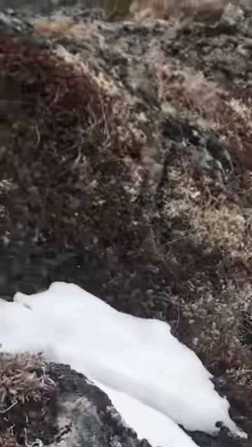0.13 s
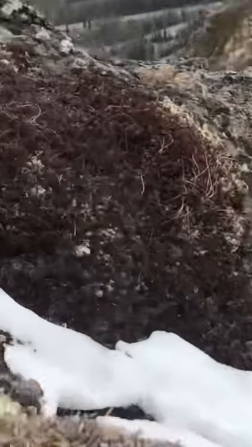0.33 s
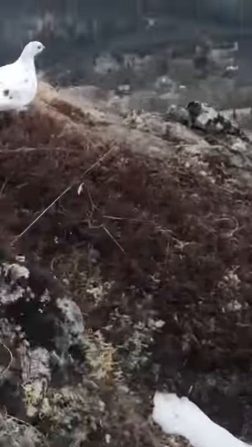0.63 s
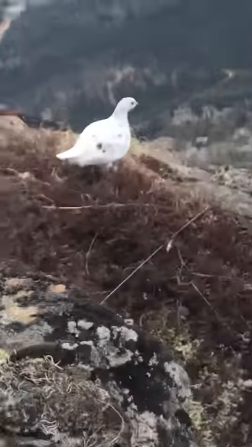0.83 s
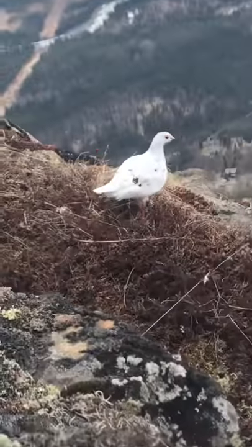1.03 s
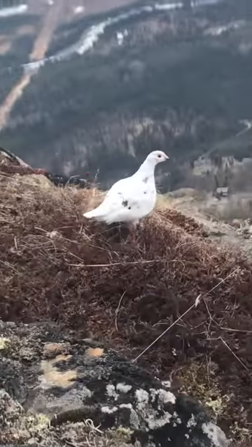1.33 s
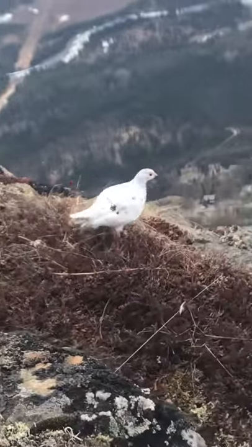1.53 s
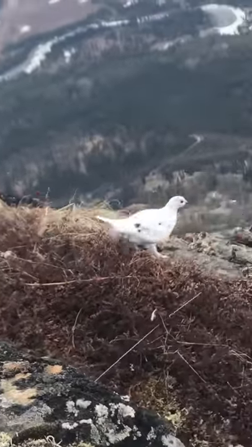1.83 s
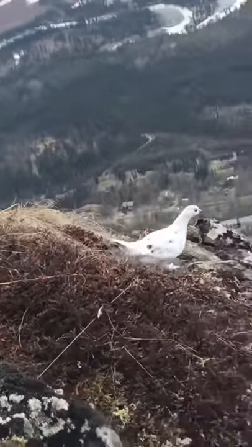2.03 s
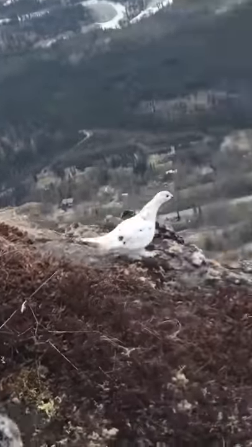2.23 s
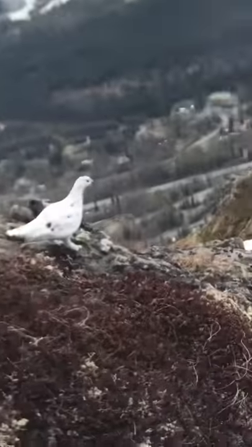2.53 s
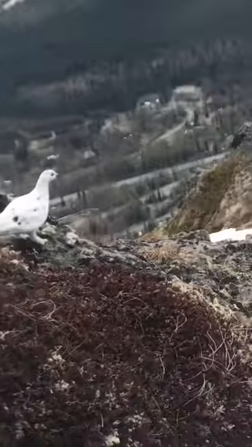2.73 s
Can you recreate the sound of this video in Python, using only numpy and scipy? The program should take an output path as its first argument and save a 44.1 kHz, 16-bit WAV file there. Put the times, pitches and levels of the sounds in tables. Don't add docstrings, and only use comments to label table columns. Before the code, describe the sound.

Clicking grouse calls come in two short runs outdoors, after close twig knocks and dry rustling; low wind thumps and pops on the microphone, over a faint valley hum and a very distant songbird whistle.

```python
import sys
import numpy as np
from scipy import signal
from scipy.io import wavfile
from scipy.ndimage import uniform_filter1d

SR = 44100
rng = np.random.default_rng(int(sys.argv[2]) if len(sys.argv) > 2 else 0)


def rack_gain(trim_db):
    fader = np.asarray(trim_db, float)
    return 10 ** (fader / 20)


def store_wav(level_fs):
    pcm = np.round(np.clip(np.atleast_2d(level_fs), -1, 1) * 32767)
    wavfile.write(sys.argv[1], SR, pcm.T.astype(np.int16))


N = 127890


def rms_one(x):
    return x / np.sqrt(np.mean(x ** 2) + 1e-20)


def butter_filter(x, order, hz, kind="low"):
    return signal.sosfilt(signal.butter(order, hz, kind, fs=SR, output="sos"), x)


def at_hz(points, hz):
    points_hz, points_db = np.array(points).T
    return np.interp(np.log(hz), np.log(points_hz), points_db, left=-80, right=-80)


def drift(rate):
    pole = np.exp(-80 * np.pi * rate / SR)
    white = rng.standard_normal(N // 40 + 2002)
    slow = signal.lfilter([1], [1, -2 * pole, pole * pole], white)[2000:]
    return np.interp(np.arange(N) / 40, np.arange(len(slow)), rms_one(slow))


def ring(start_s, peak_db, hz, t60_s):
    out, start = np.zeros(N), int(start_s * SR)
    t = np.arange(min(N - start, SR // 10)) / SR
    out[start:start + len(t)] = rack_gain(peak_db - 60 * t / t60_s) * np.sin(2 * np.pi * hz * t)
    return out


def bank(spectrum, white, band_db):
    hz = np.array(spectrum)[:, 0]
    edges = hz[0] * 2 ** np.arange(0, np.log2(hz[-1] / hz[0]) + .2, 1 / 3)
    out = 0
    for k, (low, high) in enumerate(zip(edges, edges[1:])):
        band = butter_filter(white[k % 2], 2, [low, high], "band")[-N:]
        centre_hz = min(np.sqrt(low * high), hz[-1])
        out = out + band * rack_gain(at_hz(spectrum, centre_hz) + band_db(k))
    return out


def gust_db():
    # time_s, level_db
    gusts = [(0.0, -29.5), (0.022, -25.5), (0.65, -31), (0.981, -17.5), (1.061, -23), (1.442, -23),
             (1.48, -23), (1.72, -19.5), (1.788, -28), (2.029, -21), (2.05, -25), (2.352, -20.5),
             (2.38, -30.5), (2.579, -20.5), (2.619, -33), (2.749, -13.5), (2.809, -29.5), (2.9, -16.5)]
    return np.interp(np.arange(N) / SR, *np.transpose(gusts))


def valley():
    # band_hz, level_db (per Hz)
    valley_spectrum = [(280, -24.5), (480, -6), (875, -5), (1090, -7), (2080, -21), (2740, -23),
                       (5000, -30), (15900, -33.5)]
    level_db, duck_db_per_gust_db, duck_s = -62, 0.66, 1
    gust = uniform_filter1d(gust_db(), int(duck_s * SR))
    white = rng.standard_normal((2, N + SR))
    hum = rms_one(bank(valley_spectrum, white, lambda k: drift(3.6)))
    return rack_gain(level_db - duck_db_per_gust_db * (gust - gust.mean())) * hum


def songbird():
    # start_s, length_s, from_hz, to_hz, level_db
    twitter = [
        (2.447, 0.079, 2650, 2860, -84),
        (2.516, 0.027, 3830, 3470, -81),
        (2.572, .035, 3500, 3200, -79),
        (2.634, 0.021, 3300, 3300, -76.5),
    ]
    rough_db = 7
    out = np.zeros(N)
    for start_s, length_s, from_hz, to_hz, level_db in twitter:
        t = np.arange(int(length_s * SR)) / SR
        cycles = from_hz * t + (to_hz - from_hz) * t ** 2 / length_s / 2
        swell = np.sqrt(2 * np.sin(np.pi * t / length_s))
        level = rack_gain(level_db + rough_db * drift(150.0)[:len(t)])
        start = int(start_s * SR)
        out[start:start + len(t)] += level * swell * np.sin(2 * np.pi * cycles)
    return out


def wind():
    # band_hz, level_db (per Hz)
    wind_spectrum = [(27, -18), (49, 8), (75, 5.5), (150, -11), (220, -26.5), (290, -57.5), (460, -60.5),
                     (700, -62.5)]
    # time_s, width_s, change_db
    shoves = [(0.236, 0.017, -7.5), (0.353, 0.035, -2.5), (0.597, 0.016, -7.5), (.76, 0.017, 3),
              (.855, 0.021, -7.5), (0.962, 0.011, 5.5), (1.11, 0.0082, -2), (1.292, 0.021, 6),
              (1.391, 0.028, 2.5), (1.497, 0.0094, -10), (1.694, 0.029, 4), (1.944, 0.01, 9.5),
              (2.015, 0.0048, 7), (2.619, .02, -5), (2.752, 0.018, 0), (2.884, 0.0093, 5)]
    low_hz, top_hz, even_s = 32, 417, 0.04
    lump_db, flutter_db, flutter_grows_db, brightens = 0.1, 4, 2.0, 0.6
    t = np.arange(N) / SR
    gust = gust_db()
    for time_s, width_s, change_db in shoves:
        gust = gust + change_db * np.exp(-((t - time_s) / width_s) ** 2)

    def band_db(k):
        flutter = (flutter_db + flutter_grows_db * k / 10) * drift(21.7)
        return flutter + brightens * k / 10 * (gust - gust.mean())

    noise = bank(wind_spectrum, rng.standard_normal((2, N + SR)), band_db)
    noise = butter_filter(noise, 4, low_hz, "high")
    size = int(even_s * SR)
    power = uniform_filter1d(uniform_filter1d(noise ** 2, size), size // 2)
    even = noise / np.sqrt(np.abs(power) + 1e-12)
    return butter_filter(rack_gain(gust + lump_db * drift(6.3)) * even, 4, top_hz)


def eddies():
    # start_s, peak_db, pitch_hz
    bursts = [(.958, -27.5, 354), (.975, -29, 382), (.968, -23, 252), (1.001, -17.5, 229), (0.99, -31, 375),
              (1.008, -16.5, 486), (1.063, -33.5, 478), (1.304, -35, 520), (1.325, -43, 295.5),
              (1.434, -28.5, 322), (1.512, -44.5, 390), (1.543, -35, 332), (1.531, -30.5, 199),
              (1.561, -35.5, 200), (1.612, -19.5, 472), (1.637, -27.5, 357), (1.663, -29, 404),
              (1.6689, -14.5, 383), (1.6842, -17.5, 398), (1.74, -33, 565), (1.94, -58, 289),
              (2.081, -27, 340), (2.345, -29, 373), (2.36, -28, 391), (2.701, -33, 248),
              (2.736, -33.5, 329), (2.771, -29.5, 234)]
    rise_s, fall_s, sag_per_s = 0.00073, 0.0088, 110
    out, t = np.zeros(N), np.arange(SR // 20) / SR
    shape = (1 - np.exp(-t / rise_s)) ** 2 * np.exp(-t / fall_s)
    shape = shape / shape.max()
    signs = rng.choice([-1, 1], len(bursts))
    for (start_s, peak_db, pitch_hz), sign in zip(bursts, signs):
        cycles = pitch_hz * (1 - np.exp(-sag_per_s * t)) / sag_per_s
        start = int(start_s * SR)
        out[start:start + len(t)] += sign * rack_gain(peak_db - 2.0) * shape * np.sin(2 * np.pi * cycles)
    return out


def rustle():
    # start_s, length_s, level_db, lower_half_db
    strokes = [(0.011, 0.062, -74.5, 14.5), (0.092, 0.047, -64.5, 5), (0.223, 0.0077, -71, 11),
               (0.327, 0.017, -61.5, -4), (.437, 0.0074, -61, 2), (0.446, 0.036, -68.5, 0.5),
               (0.488, 0.066, -69.5, -4), (0.555, 0.024, -60, -2), (.01, 0.83, -75.5, 3.5),
               (1.639, 0.064, -69.5, -1), (1.734, 0.26, -71.5, -5.5), (1.796, 0.047, -67, -12),
               (1.912, 0.057, -80, -9), (2.039, 0.015, -61.5, -1.5), (2.075, 0.0062, -73, -13),
               (2.108, .022, -72.5, -4), (2.312, .035, -85, -9)]
    # band_hz,
    # level_db (per Hz)
    rustle_spectrum = [(3000, -13), (4300, -4), (6200, -7.5), (7600, -9.5), (9300, -2.5), (10500, -4),
                       (12300, -1), (15800, 1)]
    grains_per_s, grain_spread_db, edge_s, edge_share = 4000, 3.2, .005, .28
    t = np.arange(N) / SR
    low, high = np.zeros(N), np.zeros(N)
    for start_s, length_s, level_db, lower_half_db in strokes:
        inside_s = np.minimum(t - start_s, start_s + length_s - t)
        shape = np.clip(inside_s / (edge_s / 4 + edge_share * length_s) + .5, 0, 1)
        high += rack_gain(level_db) * shape
        low += rack_gain(level_db + lower_half_db) * shape
    sizes = rack_gain(grain_spread_db * np.minimum(rng.exponential(1, (2, N)), 5))
    sizes = sizes * rng.choice([-1, 1], (2, N))
    grains = sizes * (rng.random((2, N)) < grains_per_s / SR)
    grains = grains + 0.05 * rng.standard_normal((2, N))
    noise = rms_one(bank(rustle_spectrum, grains, lambda k: 1.5 * drift(30.0)))
    noise = rack_gain(2.8 * drift(60.0)) * noise
    return low * butter_filter(noise, 4, 8000) + high * butter_filter(noise, 4, 8000, "high")


def snaps():
    # start_s, peak_db, body_hz, crack_db
    twigs = [(.0002, -34, 1830, 3), (.0025, -36, 1240, -10), (.055, -47, 2300, -12),
             (0.059, -33.5, 1100, -9), (.078, -41, 1500, -4), (.0805, -30.5, 1060, -15),
             (0.082, -26.5, 650, -9), (0.0965, -26, 1140, -10.5), (0.1043, -21, 1450, -6.5),
             (.1058, -28, 940, -10), (.108, -26.5, 595, -16), (0.111, -41, 1870, -18),
             (.124, -41, 4050, -2), (.2334, -28, 1170, -15), (0.2554, -25.5, 1220, -12.5),
             (0.2845, -40, 1200, -10), (.404, -38, 1110, -9), (0.4579, -37.5, 1170, -10),
             (0.652, -47, 5440, -7.5), (0.6537, -37, 940, -14), (0.652, -39, 557, -26),
             (0.1053, -28, 6200, -34), (.2336, -42.5, 6560, -30), (0.0962, -44, 6200, -30)]
    # mode_hz, mode_db, t60_s
    crack_modes = [(2800, 0, .0045), (6200, -21, .004)]
    # start_s, peak_db, pitch_hz
    dry_ticks = [(0.0485, -44, 6200), (0.036, -57, 4200), (0.2237, -43.5, 9400), (.225, -46, 13500),
                 (0.224, -53, 4300), (0.345, -46, 13050), (.4425, -55, 12000), (0.5652, -52, 12580),
                 (.569, -53, 9300), (0.7155, -53, 12000), (1.8003, -42, 11800), (1.8089, -57, 9500),
                 (1.931, -51, 12100), (2.1042, -51, 9050), (2.1114, -73, 8200), (2.1185, -40, 13900)]
    knock_cycles, tick_t60_s = 5.5, .003
    out, ticks = np.zeros(N), np.zeros(N)
    for start_s, peak_db, body_hz, crack_db in twigs:
        knock_s = knock_cycles / body_hz
        out += ring(start_s, peak_db, body_hz, max(knock_s, .004))
        out -= ring(start_s, peak_db - 5, 1.71 * body_hz, knock_s / 2)
        for mode_hz, mode_db, t60_s in crack_modes:
            level_db = peak_db + crack_db + mode_db + rng.normal(0, 1.9)
            out += ring(start_s, level_db, mode_hz * rng.normal(1, 0.035), t60_s)
    for start_s, peak_db, pitch_hz in dry_ticks:
        ticks += ring(start_s, peak_db, pitch_hz, tick_t60_s)
    return butter_filter(out + 1e-18, 4, 7000) + ticks


def grouse():
    # start_s, peak_db, throat_hz, mouth_hz, beak_hz
    tight = [
        (.8176, -51, 1870, 2800, 3700),
        (.8726, -49, 1927, 3500, 4600),
        (.9207, -40, 1927, 3560, 4590),
        (.9636, -41, 1884, 3150, 4590),
        (2.1737, -43.5, 1808, 3190, 4600),
        (2.2185, -38.5, 1927, 3190, 4640),
        (2.2626, -38.5, 1841, 3250, 5070),
    ]
    # mode_hz, mode_db, t60_s
    tight_modes = [(810, 2, .017), (1900, 1, .015), (3300, -4, .01), (4620, -5, .009), (6050, -7, .004),
                   (1330, 1, .006)]
    # start_s, peak_db, chest_hz, throat_hz, mouth_hz
    opened = [
        (1.0119, -35, 1055, 1733, 3650),
        (1.1005, -35, 1162, 1754, 3908),
        (1.1965, -37.5, 1076, 1668, 3780),
    ]
    # mode_hz, mode_db, t60_s
    open_modes = [(1100, 0, .031), (1730, 0, .031), (3800, -16, .011), (5480, -14, .007)]
    tight_snap_db, open_snap_db, snap_low_hz = 4, -12, 2400
    puff_db, puff_t60_s, throat_top_hz = -9.5, .008, 6900
    echo_s, echo_db = 0.0028, -13.5
    turn_dulls_db_per_s = 3.2
    out, snap, t = np.zeros(N), np.zeros(N), np.arange(SR // 50) / SR
    kinds = ((tight, tight_modes, 1, tight_snap_db), (opened, open_modes, 0, open_snap_db))
    for clicks, modes, first, snap_db in kinds:
        for start_s, peak_db, *pitches in clicks:
            start = int(start_s * SR)
            dull_db = turn_dulls_db_per_s * (start_s - 1)
            tuned = [mode[0] for mode in modes]
            tuned[first:first + len(pitches)] = pitches
            for k, (hz, (_, mode_db, t60_s)) in enumerate(zip(tuned, modes)):
                level_db = peak_db + mode_db - 3.5 - dull_db * (hz > 2500)
                out += (-1) ** k * ring(start_s, level_db, hz, t60_s)
            snap[start + 4] = rack_gain(peak_db + snap_db - dull_db)
            puff = rack_gain(peak_db + modes[2][1] + puff_db - 60 * t / puff_t60_s)
            out[start:start + len(t)] += puff * rng.standard_normal(len(t))
    out += butter_filter(snap + 1e-18, 2, snap_low_hz, "high")
    out = butter_filter(out + 1e-18, 6, throat_top_hz)
    return out + rack_gain(echo_db) * np.roll(out, int(echo_s * SR))


def scene():
    far = valley() + songbird()
    close = wind() + eddies() + rustle() + snaps()
    return (far + close + grouse())[None]


def band_limit(x):
    return signal.sosfilt(signal.butter(12, 16080, fs=SR, output="sos"), x)


def record(dry):
    mix = signal.sosfilt(signal.cheby2(12, 50, 16350, fs=SR, output="sos"), dry)
    return band_limit(mix)


dry = scene()
out = record(dry)
store_wav(out)
```